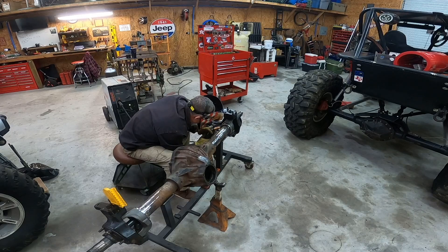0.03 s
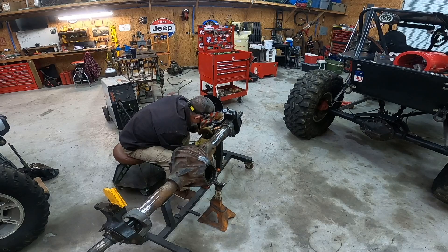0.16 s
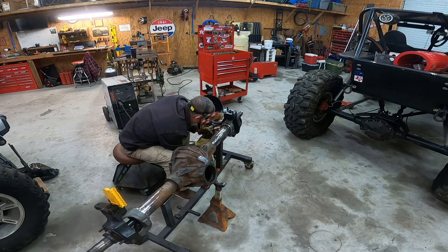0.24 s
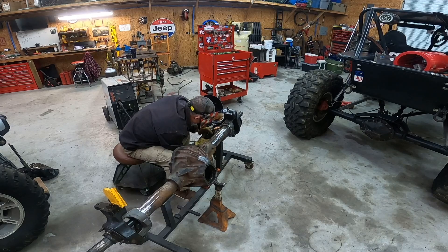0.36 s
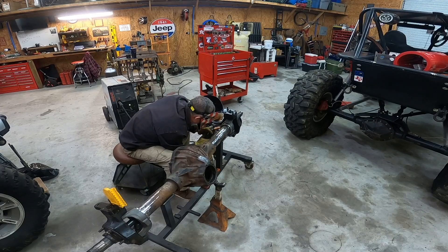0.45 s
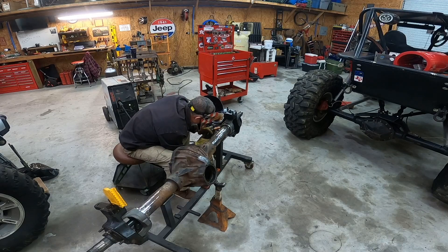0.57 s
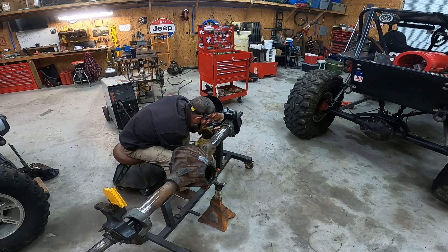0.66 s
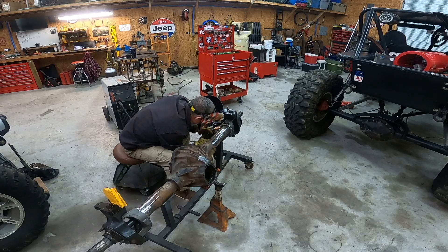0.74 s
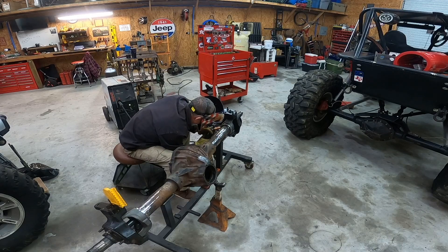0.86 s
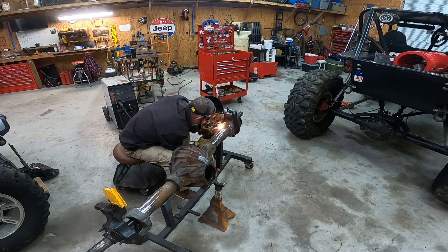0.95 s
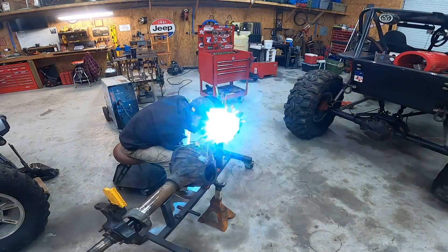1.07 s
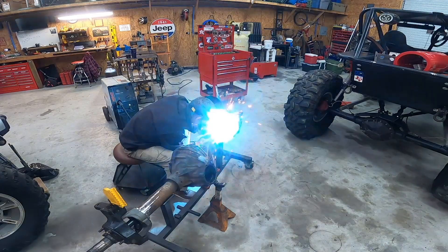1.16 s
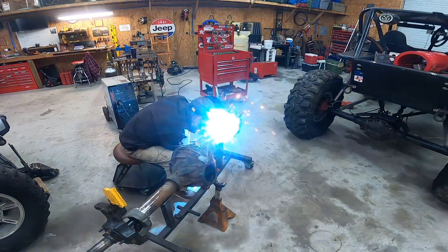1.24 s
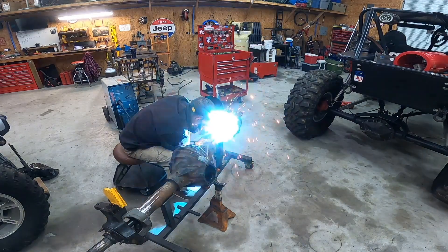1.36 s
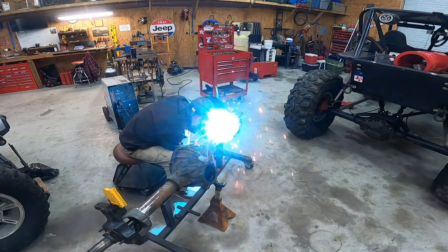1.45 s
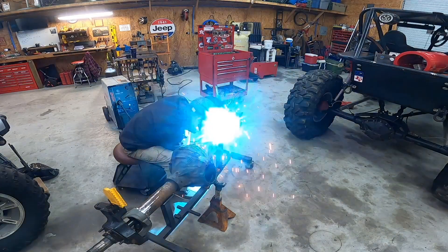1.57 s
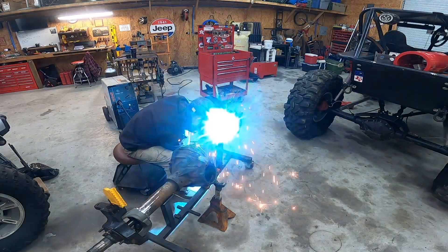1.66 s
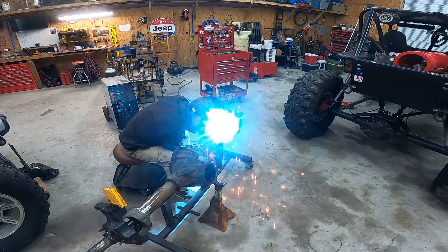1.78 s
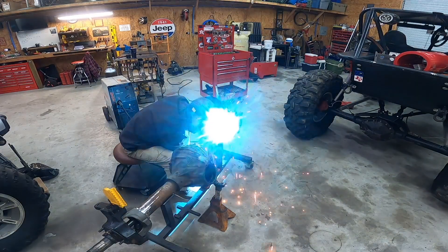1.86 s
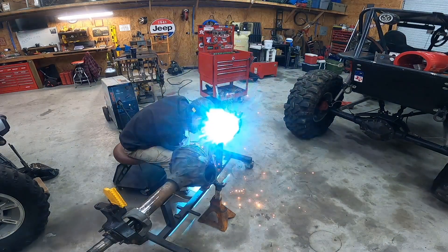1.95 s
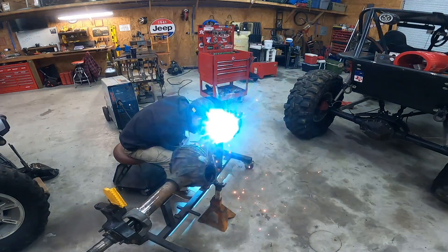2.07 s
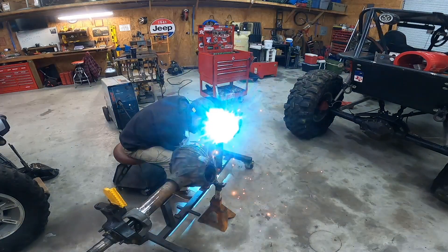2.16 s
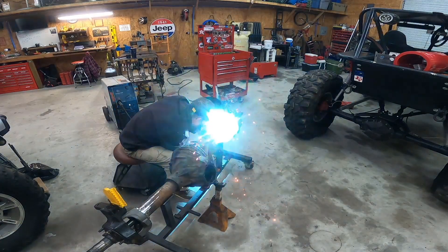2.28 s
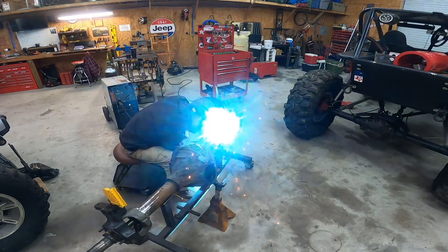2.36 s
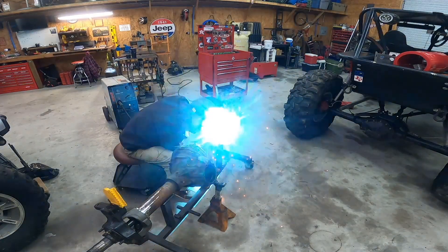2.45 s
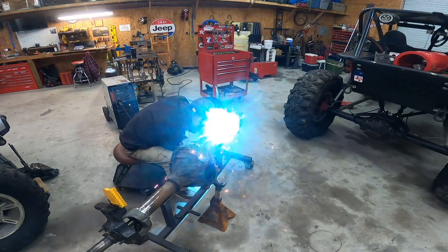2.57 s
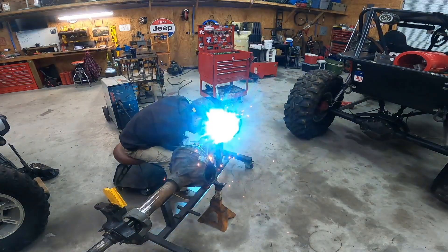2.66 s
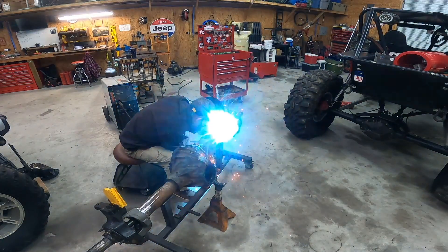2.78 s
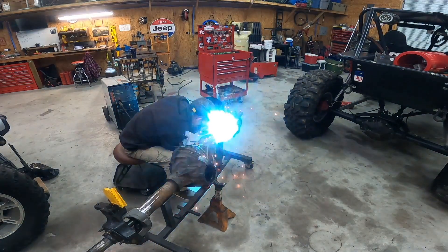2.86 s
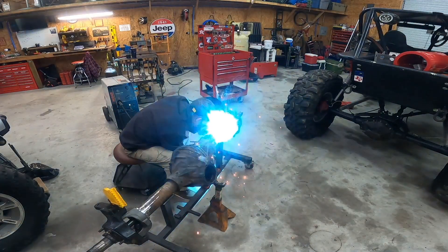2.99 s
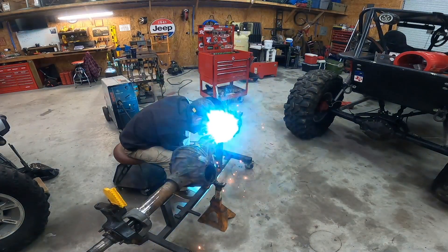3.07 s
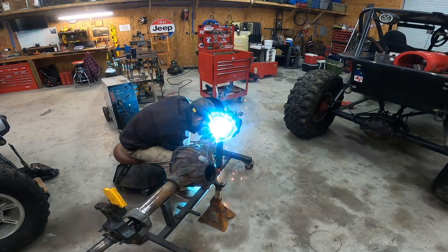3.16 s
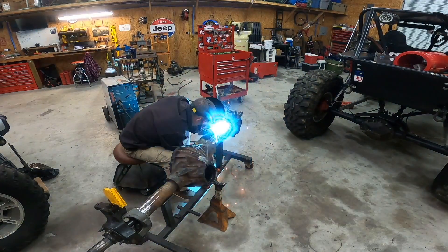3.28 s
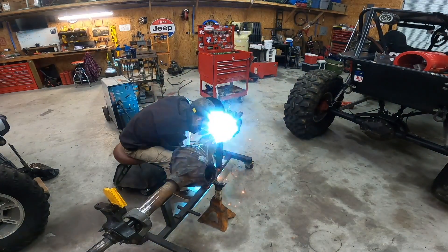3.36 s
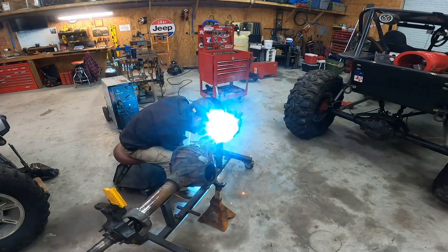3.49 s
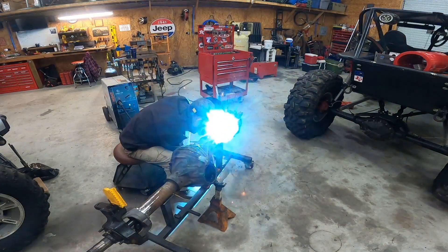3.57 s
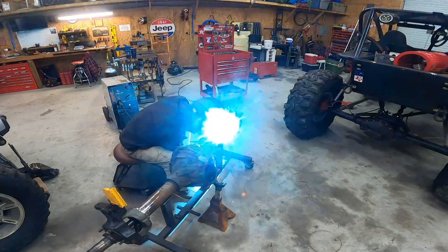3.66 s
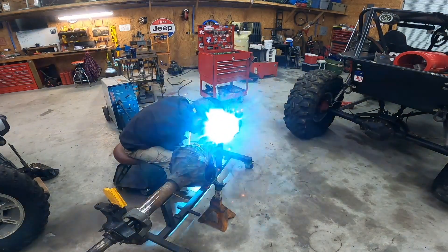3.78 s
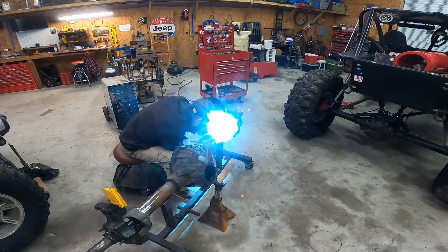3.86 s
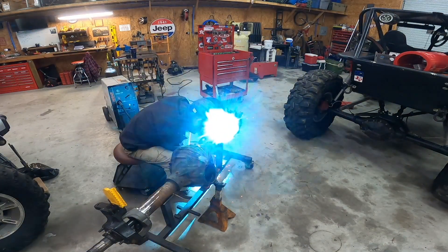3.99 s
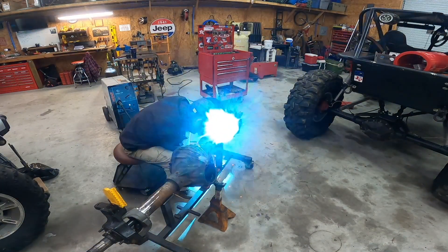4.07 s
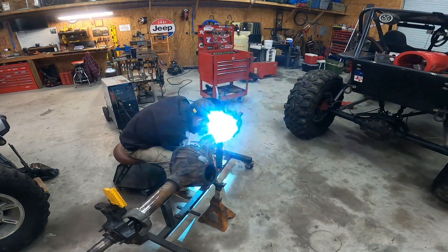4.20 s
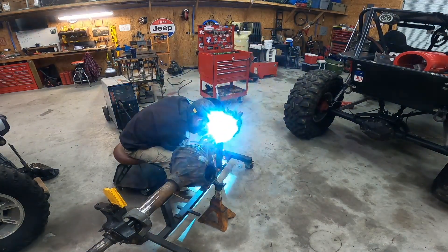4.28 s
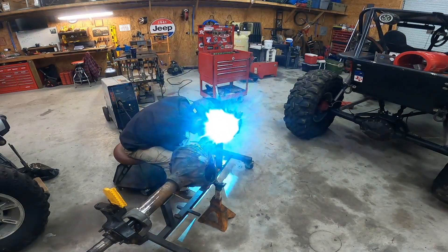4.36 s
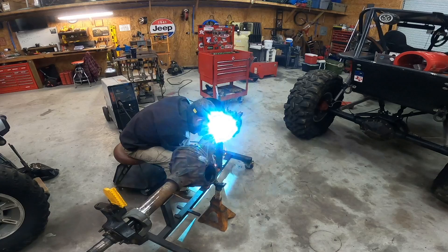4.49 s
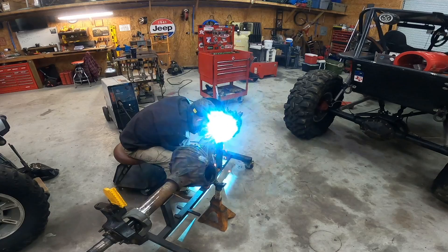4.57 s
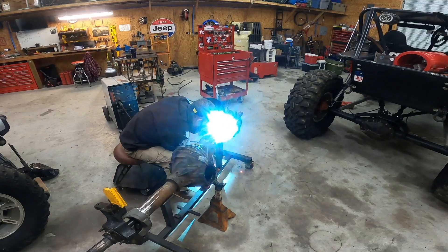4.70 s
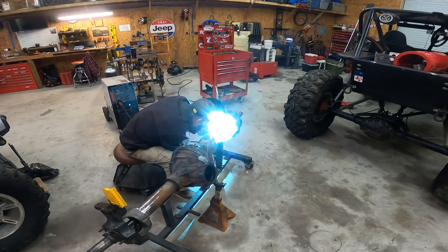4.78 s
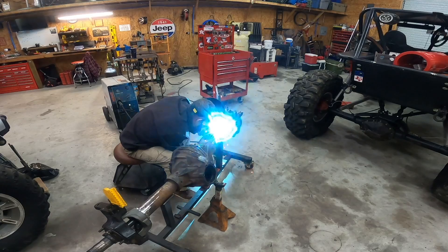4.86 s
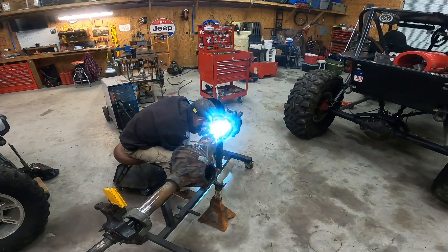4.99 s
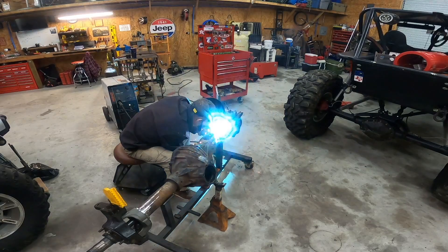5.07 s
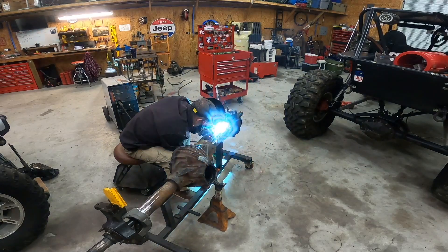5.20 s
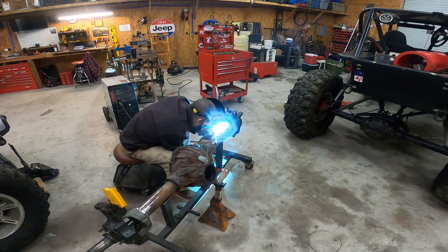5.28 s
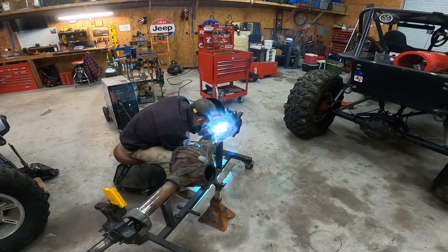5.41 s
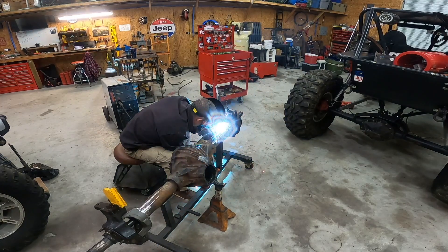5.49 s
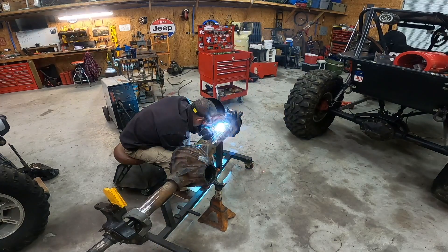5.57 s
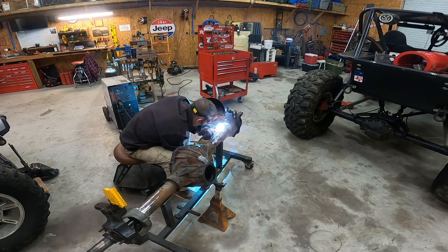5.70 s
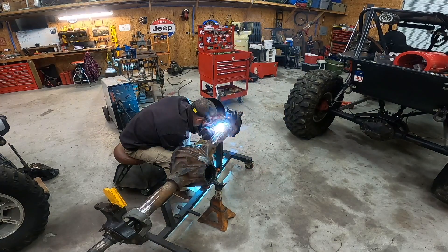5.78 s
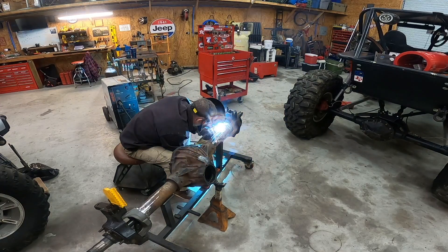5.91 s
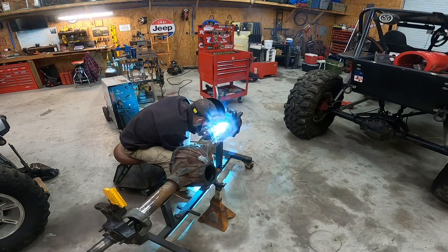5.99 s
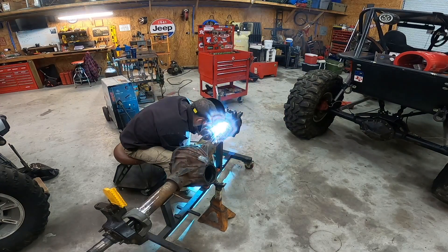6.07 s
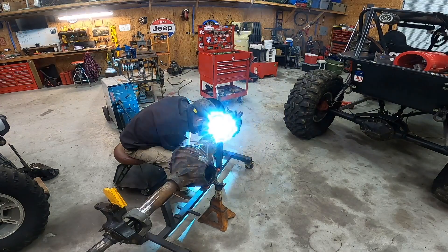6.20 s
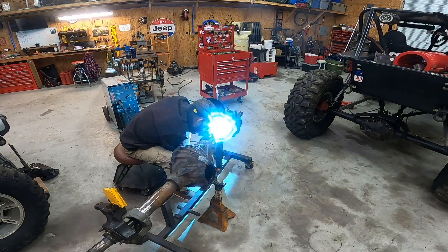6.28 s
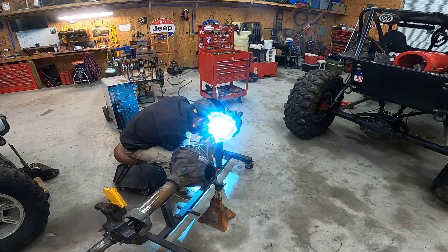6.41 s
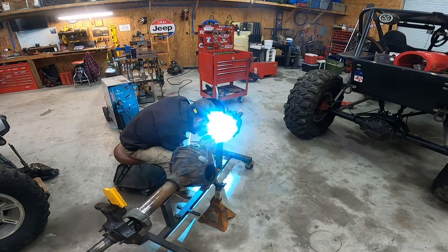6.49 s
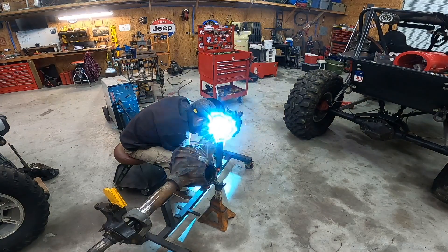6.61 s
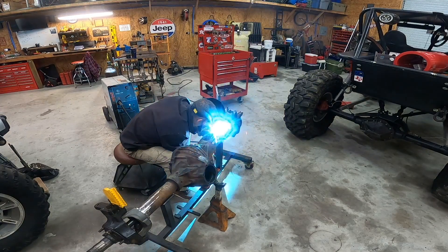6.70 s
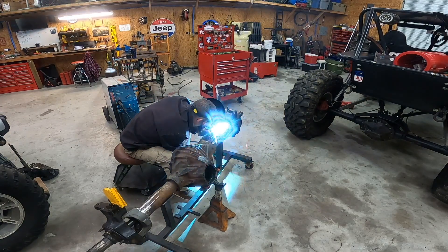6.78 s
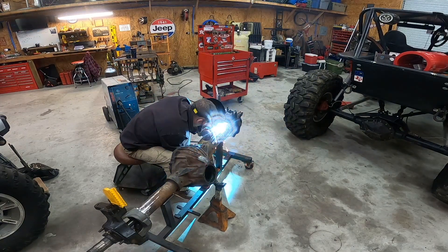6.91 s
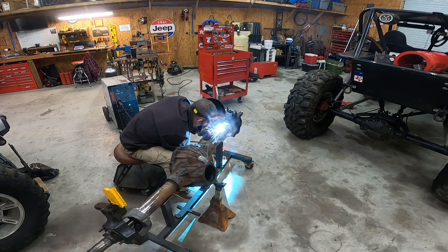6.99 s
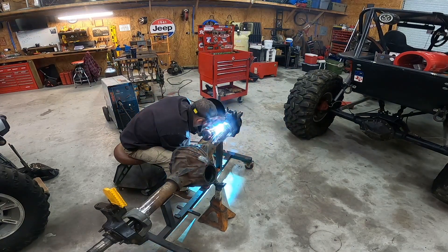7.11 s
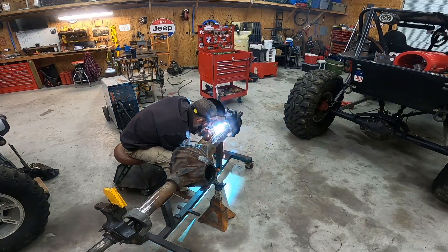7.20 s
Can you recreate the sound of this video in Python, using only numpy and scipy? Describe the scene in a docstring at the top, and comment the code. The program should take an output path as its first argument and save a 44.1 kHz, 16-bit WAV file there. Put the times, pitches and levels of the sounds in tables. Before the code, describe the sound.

Heard by a small fixed camera in a home garage: nearly a second of low air noise, then a crisp gas puff and muffled ignition whoomp. A harsh buzzing weld follows, dozens of snapping shorts a second, with taller cracks, dense sputters and faint steel ringing. From about five seconds it drops markedly, shaded by the tube, uneven and hollow with small spitting flurries and bright fizzing ticks. Live room echoes surround it; no clear stop.

```python
"""In a workshop a wire-feed welder lays one bead on a steel axle tube, heard by a small camera.
After fan air, hum and a faint squeak, gas hisses and the wire catches with a whoomp.
Then it shorts and re-ignites, at first very fast, later some 65 to 90 times a second, in sharp pulses.
Taller pops stand out, and the pool sputters in spells of dense noise pulses.
As the torch moves round behind the tube, filters and gains make the crackle softer and duller."""
import sys
import numpy as np
from scipy import signal
from scipy.fft import rfft, irfft, next_fast_len
from scipy.io import wavfile
from scipy.ndimage import uniform_filter1d, map_coordinates

SR = 44100
rng = np.random.default_rng(int(sys.argv[2]) if len(sys.argv) > 2 else 0)


def master(y):
    """Save y as 16-bit WAV."""
    cut = np.clip(np.atleast_2d(y).T, -1, 1)
    pcm = np.round(cut * 32767)  # scale
    wavfile.write(sys.argv[1], SR, pcm.astype(np.int16))


N = 319725

# how far the arc has moved behind the tube: t/s, place (0 in view, 1 at the edge, 2 hidden)
HIDDEN_PATH = [(1, 0), (3.3, 0), (4, 0.53), (4.35, 1.26), (4.9, 1.33), (5.35, 1.78), (7.2, 2)]
# loud pops of bursting wire: t/s, level/dB
BIG_POPS = [(1.0435, 0.5), (1.126, -3), (1.1521, 5.5), (1.205, 2), (1.222, 6.5), (1.287, 5.5),
            (1.3093, 5.5), (1.3362, 4.5), (1.3698, 2), (1.3927, 5), (1.4164, 0), (1.4344, 4.5), (1.5279, 5),
            (1.6718, 3.5), (1.7205, 4), (1.7862, 1), (1.792, -3), (1.9222, 3.5), (1.968, 1), (2.0774, 4.5),
            (2.0929, 4), (2.2111, 5), (2.2366, 2.5), (2.2784, 4.5), (2.2923, 4), (2.351, 2.5), (2.4714, 4),
            (2.487, 4.5), (2.5108, 5.5), (2.6, 5), (2.663, 5), (2.6945, 4.5), (2.7501, 4), (2.8438, 5),
            (2.9133, 5.5), (2.9697, 3.5), (3.635, -1), (3.7353, 2), (3.764, 4.5), (3.8575, 5.5),
            (4.0759, 5.5), (4.1, 2), (4.1182, 1), (4.202, 3), (4.252, 3), (4.296, 4), (4.349, 0),
            (4.5202, 3), (4.5466, 6), (4.559, 2.5), (4.595, 3), (4.62, 4.5), (4.6273, 3), (4.644, 1),
            (4.863, 1.5), (4.8938, 6.5), (4.9278, -2.5), (5.1514, -5), (5.1926, 2.5), (5.2113, -1),
            (5.304, -3), (5.342, -2.5), (5.4604, -5), (5.4851, -5), (5.5195, -1), (5.5314, -9), (5.596, -4),
            (5.7315, -9), (5.764, -1.5), (5.8216, 1), (5.837, -3), (5.883, -5), (5.9142, -5), (5.9823, -3),
            (5.9998, -1), (6.0154, -3), (6.026, -9), (6.1103, -5.5), (6.1644, -7), (6.2036, -5),
            (6.2363, -4), (6.329, -2), (6.6466, -5.5), (6.703, -2), (6.8538, -4), (7.04, -7), (7.08, -5)]


def amp(db):
    """Turn decibels into gain."""
    return 10 ** (np.asarray(db) / 20)


def along(points, hz):
    """Read a curve of (frequency, value) points, with frequency on a log axis."""
    f, v = np.transpose(points)
    return np.interp(np.log(hz + 1), np.log(f + 1), v)


def curves(rows):
    """Draw straight lines between rows: one value per sample for each column after the time."""
    s, *cols = np.transpose(rows)
    return [np.interp(np.arange(N) / SR, s, c) for c in cols]


def filtered(x, response):
    """Multiply the spectrum of x by a response of frequency."""
    m = next_fast_len(N + SR // 2)
    hz = np.fft.rfftfreq(m, 1 / SR)
    return irfft(rfft(x, m) * response(hz), m)[..., :N]


def coloured(x, spectrum, size=4096):
    """Give x a tone colour with a filter of energy 1 that never sounds ahead of its input."""
    gain = amp(along(spectrum, np.fft.rfftfreq(size, 1 / SR)))
    # folding the cepstrum (spectrum of the log gain) moves the filter's energy to its start
    cepstrum = irfft(np.log(gain))
    cepstrum[1:size // 2] *= 2
    cepstrum[size // 2 + 1:] = 0
    kernel = irfft(np.exp(rfft(cepstrum)))
    return signal.oaconvolve(x, kernel / np.linalg.norm(kernel))[:N]


def wobble(rate):
    """Draw a smooth random curve through rate random points a second."""
    knots = rng.standard_normal(int(N * rate / SR) + 4)
    return map_coordinates(knots, [np.arange(N) * rate / SR])


def steady(x, seconds):
    """Even out the running power of x towards 1."""
    width = int(seconds * SR)
    power = uniform_filter1d(uniform_filter1d(x ** 2, width), width)
    return x / np.sqrt(np.abs(power) + 1e-9)


def pulses(rate, scatter, spread_db, count=9000):
    """Place single-sample pulses at uneven gaps and of uneven size, about rate a second."""
    gap, size = rng.standard_normal((2, count))
    gaps = np.exp(scatter * gap)
    # each pulse falls where the running count of the rate reaches its turn
    at = np.searchsorted(np.cumsum(rate) / SR, np.cumsum(gaps / gaps.mean()))
    sizes = amp(spread_db * np.tanh(size))
    return np.bincount(at[at < N], sizes[at < N], N)


def swells(rows, attack, release):
    """Sum gains from (start s, length s, dB) rows: each rises, holds and dies away."""
    t = np.arange(N) / SR
    total = 0
    for s, length, db in rows:
        rise = np.clip((t - s) / attack, 0, 1)
        fall = np.exp(-np.maximum(t - s - length, 0) / release)
        total = total + amp(db) * rise * fall
    return total


def idle():
    """Fan air is filtered noise; the welding machine adds a faint, unsteady sine hum."""
    # tone of the quiet shop: f/Hz, level/dB
    air_tone = [(25, -4), (50, -38), (80, -13), (120, -1.5), (200, 0), (450, -3), (650, -10.5),
                (1200, -15.5), (2400, -22.5), (4000, -31.5), (6500, -48), (12000, -64)]
    mains_hz = 120
    hum = amp(-72.0 + 1.7 * wobble(7)) * np.sin(2 * np.pi * mains_hz * np.arange(N) / SR)
    air = amp(-59.5 + wobble(14)) * coloured(rng.standard_normal(N), air_tone)
    return hum + air


def squeak(waver_hz=30):
    """As the welder takes aim something squeaks faintly: short tones of wavering pitch."""
    # tones of the squeak: f/Hz, level/dB
    tones = [(3214, -89), (3671, -80)]
    start_s, length_s = 0.45, .09
    total = 0
    for hz, db in tones:
        phase = 2 * np.pi * np.cumsum(hz + waver_hz * wobble(61)) / SR
        swell = swells([(start_s, length_s, db)], attack=.02, release=.02)
        total = total + swell * np.sqrt(2) * np.sin(phase)
    return total


def burning(start=0.92, rise=0.021):
    """Rise from 0 before the trigger is pulled to 1 once gas and current flow (seconds)."""
    return np.clip((np.arange(N) / SR - start) / rise, 0, 1) ** 2


def touches(spikes, count=9000):
    """The wire clicks as it touches the pool, a few milliseconds before each short bursts."""
    short_s, short_scatter, spread_db = .0036, .35, 5
    lead, size = rng.standard_normal((2, count))
    at = np.flatnonzero(spikes)
    early = at - short_s * (1 + short_scatter * np.tanh(lead[:len(at)])) * SR
    sizes = spikes[at] * amp(spread_db * np.tanh(size[:len(at)]))
    return np.bincount(np.clip(early, 0, N - 1).astype(int), sizes, N)


def fizz(spikes, rise_s=0.00033, fall_s=0.0013):
    """Surround each spike with a brief spray of noise."""
    t = np.arange(-(SR // 100), SR // 100 + 1) / SR
    shape = np.exp(-np.abs(t) / np.where(t < 0, rise_s, fall_s))
    power = signal.oaconvolve(spikes ** 2, shape / shape.sum(), "same")
    return np.sqrt(np.abs(power)) * rng.standard_normal(N)


def crackle(trim_db=-2.5, flutter_db=1.05, fizz_share=0.62):
    """Each short makes a touch and a burst spike, over a sizzle of tiny ticks; returns (shorts, sizzle)."""
    # strength of the crackle ahead of the trim: t/s, level/dB
    strength = [(.94, -27.5), (1.02, -39), (1.1, -27), (1.14, -21.5), (1.25, -25), (1.4, -24.5),
                (1.55, -23.5), (2.2, -20.5), (2.9, -23), (3.45, -21.5), (3.75, -22.5), (4.25, -23.5),
                (4.55, -24.5), (4.75, -24), (5.05, -26), (5.3, -31.5), (5.55, -31), (5.8, -30.5),
                (6.3, -33.5), (6.55, -36), (7.25, -34)]
    # wire feed: t/s, shorts per second/Hz, sizzle against shorts/dB, touch against burst/dB
    feed = [(.93, 260, 5, -9), (1.1, 160, 1, -7), (1.25, 69, -9, -3), (1.7, 87.3, -7, -5.5),
            (3.6, 82.7, -7, -2), (4.4, 89.5, -29, -10), (5.0, 91, -16, -6), (5.5, 73.4, -1, -6),
            (7.2, 65.7, -3.5, -11)]
    # flurries in which the wire stubs and spits harder: start/s, length/s, level over the crackle/dB
    flurries = [(1.305, 0.03, -2), (5.145, 0.017, 4), (5.615, 0.013, -2), (5.67, 0.02, -5),
                (5.755, .015, -1), (5.81, 0.026, 3.5), (5.985, 0.047, 1.5), (6.21, 0.023, 3),
                (6.262, 0.017, 2.5), (6.38, 0.026, -1.5), (6.67, 0.031, 5.5), (6.85, 0.012, 3),
                (7.02, 0.031, 5), (7.225, 0.023, 2.5)]
    # moments in which the arc nearly goes out: start/s, length/s
    stalls = [(1.157, 0.032), (2.697, 0.028), (2.979, 0.022), (3.73, 0.029), (4.658, 0.022), (5.211, .025),
              (5.563, 0.024), (6.722, 0.025)]
    stall_db = -28
    # the arc is shorted out before a big pop and takes a moment to resume
    hush_db, hush_s, recover_s = -8, .012, 0.0027

    level_db, = curves(strength)
    rate, sizzle_db, touch_db = curves(feed)
    spitting = np.hypot(1, swells(flurries, attack=0.0078, release=0.011))
    flutter = amp(flutter_db * wobble(40))  # the arc length never holds still
    level = burning() * amp(level_db + trim_db) * flutter * spitting
    level = level / np.hypot(1, amp(sizzle_db))  # share the power between shorts and sizzle
    for s, _ in BIG_POPS:
        level[round((s - hush_s) * SR):round((s + recover_s) * SR)] *= amp(hush_db)
    for s, length in stalls:
        level[round(s * SR):round((s + length) * SR)] *= amp(stall_db)

    bursts = pulses(rate, scatter=.3, spread_db=3.5)
    pairs = bursts + amp(touch_db) * touches(bursts)
    # the wire feeds evenly: slower shorts grow bigger drops
    spikes = level * steady(pairs, seconds=0.051)
    ticks = pulses(np.full(N, 900.), scatter=.9, spread_db=6.0) * rng.choice([-1, 1], N)
    sizzle = level * amp(sizzle_db) * steady(ticks, seconds=0.056)
    return spikes + fizz_share * fizz(spikes), sizzle


def gas(start=.929, length=.04, db=-32):
    """The valve opens and pressure stored in the hose escapes in a crisp hiss of filtered noise."""
    # hiss of the nozzle: f/Hz, level/dB
    hiss_tone = [(800, -35), (2800, 0), (4200, 1), (6000, -9), (9300, -6), (10700, -25), (14000, -43)]
    swell = swells([(start, length, db)], attack=0.0072, release=0.1)
    return swell * coloured(rng.standard_normal(N), hiss_tone)


def flare(lumps_db=3):
    """Each pocket of gas burns off in a short, lumpy low whoomp of filtered noise."""
    # pockets catching, the first as the arc strikes: start/s, length/s, level ahead of the swell shape/dB
    pockets = [(0.933, 0.11, -19), (.99, 0.097, -29.5), (2.317, 0.038, -23), (2.641, 0.019, -24.5),
               (3.598, 0.02714, -28.5), (4.733, 0.044, -27)]
    # whoomp of burning gas: f/Hz, level/dB
    whoomp_tone = [(25, -5), (80, -14.5), (170, -1), (280, 1.5), (450, 5), (650, 3), (1050, -3),
                   (1400, -15), (3000, -3.5), (8000, -77)]
    level = 0
    for start, length, db in pockets:
        u = np.clip((np.arange(N) / SR - start) / length, 0, 1)
        level = level + amp(db) * np.sqrt(u) * (1 - u)
    noise = amp(lumps_db * wobble(130)) * rng.standard_normal(N)
    return level * steady(coloured(noise, whoomp_tone), seconds=0.015)


def pops(fizz_share=0.4):
    """A long short ends with the wire bursting in one tall spike with a little fizz."""
    s, db = np.transpose(BIG_POPS)
    spikes = np.bincount(np.round(s * SR).astype(int), amp(db), N)
    return spikes + fizz_share * fizz(spikes)


def round_the_tube(x, sway=0.072):
    """The tube shades the treble; close echoes shift with the welder's hand and count more as the arc hides."""
    # colour of the arc in plain view: f/Hz, level/dB
    open_tone = [(30, -119), (90, -33), (220, -35.5), (550, -9.5), (1250, -3.5), (2400, -6), (2950, 6),
                 (3800, 2), (4800, -0.5), (5700, -6.5), (7100, 3), (8600, -13), (9400, -3.5),
                 (11300, -10.5), (15000, -36.5)]
    # colour at the tube's edge: f/Hz, level/dB
    edge_tone = [(30, -60), (220, -20), (550, -29), (1200, -8.5), (1700, -26), (2450, -13), (2900, 2.5),
                 (3700, 5.5), (4400, -6), (5100, -2), (5900, -11.5), (7300, -5.5), (10500, -20.5),
                 (11800, -21), (15000, -68)]
    # colour behind the tube: f/Hz, level/dB
    shaded_tone = [(30, -66), (220, -13.5), (500, -11), (900, -24), (1300, -7.5), (1600, -18),
                   (2400, -16.5), (3100, -1.5), (3800, -3), (4600, -15.5), (5900, -19.5), (6400, -16),
                   (7400, -14), (8800, -20.5), (9350, -16), (10000, -22), (10700, -20.5), (11300, -22),
                   (15000, -50)]
    # reflections off helmet, tube and housing: middle delay/s, gain ahead of the weight below
    reflections = [(.00076, 0.15), (.0014, 0.025), (.0024, 0.12)]
    hidden = np.clip(curves(HIDDEN_PATH)[0], 0, 2)
    heard = 0
    for k, tone in enumerate((open_tone, edge_tone, shaded_tone)):
        share = np.clip(1 - np.abs(hidden - k), 0, 1)
        heard = heard + coloured(x * share, tone)
    now = np.arange(N)
    late = 0
    for delay, gain in reflections:
        moving_delay = delay * SR * (1 + sway * wobble(4))
        late = late + gain * map_coordinates(heard, [now - moving_delay])
    weight = 0.95 + 2.0 * np.minimum(hidden, 1)
    return amp(0.48) * (heard + weight * late)


def steel(x):
    """The arc's pulses keep the steel parts ringing faintly in decaying sine tones."""
    # ringing modes of the steel, balanced against each other: f/Hz, level/dB
    modes = [(532.9, 17), (1265, 5.5), (2083, 23.5), (2347, 25.5), (2929, 13), (3575, 18), (4409, 21.5),
             (4608, 23), (4737, 13), (5033, -2)]
    t = np.arange(SR // 2) / SR
    t60 = .15  # seconds to fall by 60 dB
    ring = sum(amp(db - 60 * t / t60) * np.sin(2 * np.pi * hz * t) for hz, db in modes)
    return amp(-12.5) * signal.oaconvolve(x, ring / np.linalg.norm(ring))[:N]


def echoes(build=0.0036, count=10):
    """Make one room response: scattered echoes off floor and cabinets, with a diffuse tail."""
    # time for the room to fall by 60 dB: f/Hz, t/s
    room_t60 = [(150, 0.63), (1000, 1), (4000, 0.83), (12000, 0.66)]
    t = np.arange(SR // 2) / SR
    arrivals = rng.standard_normal(len(t)) * (1 - np.exp(-t / build))
    arrivals[(rng.uniform(.01, .035, count) * SR).astype(int)] += 7 * rng.choice([-1, 1], count)
    # every frequency band dies away at its own speed
    hz, s, z = signal.stft(arrivals, SR, nperseg=256)
    decay = amp(-60 * s / along(room_t60, hz)[:, None])
    decay = decay / np.linalg.norm(decay, axis=1, keepdims=True)
    tail = signal.istft(z * decay, SR, nperseg=256)[1]
    return tail / np.linalg.norm(tail)


def shop(x, count=7):
    """The room answers; its pattern of echoes changes as the torch travels."""
    # room against direct sound: f/Hz, level/dB
    room_tone = [(150, -1), (1000, -2), (2300, 4), (3000, -5.5), (3700, -5), (5000, 1), (7000, -4),
                 (12000, -7.5)]
    place = np.linspace(0, count - 1, N)
    wet = 0
    for k in range(count):
        share = np.sqrt(np.clip(1 - np.abs(place - k), 0, 1))
        wet = wet + signal.oaconvolve(x * share, echoes())[:N]
    return filtered(wet, lambda hz: amp(along(room_tone, hz)))


def sputter(flutter_db=3.5):
    """The long arc flutters over the pool in dense soft puffs, far stronger during a spell."""
    # bubbling between spells, building up as the steel melts: t/s, level/dB
    bubbling = [(1.0, -65), (1.45, -48.5), (1.65, -37), (3.0, -40), (4.3, -43), (5.1, -43.5), (5.4, -39.5),
                (6.1, -41), (6.35, -40.5), (6.65, -44.5), (7.25, -43)]
    # spells in which the arc grows long: start/s, length/s, level/dB
    spells = [(1.69, 0.031, -44), (1.83, 0.042, -32), (2.32, 0.099, -31), (2.565, 0.09, -30.5),
              (2.97, 0.048, -38), (3.46, 0.17, -33.5), (3.67, 0.055, -30), (3.94, 0.072, -32),
              (4.56, 0.047, -35), (4.73, 0.101, -29), (4.86, 0.048, -31.5), (5.04, 0.044, -33),
              (7.015, 0.044, -39)]
    # tone of the puffs: f/Hz, level/dB
    puff_tone = [(25, -35), (80, -36), (130, -32.5), (200, -4.5), (450, 5.5), (750, 9.5), (1250, 3),
                 (2200, 1.5), (3500, 2), (8000, -40)]
    pool_db, = curves(bubbling)
    level = np.hypot(amp(pool_db), swells(spells, attack=0.0013, release=0.011))
    puffs = pulses(np.full(N, 380.), scatter=.7, spread_db=3.0) * rng.choice([-1, 1], N)
    puffs = steady(puffs, seconds=0.046)
    return coloured(burning() * level * amp(flutter_db * wobble(36)) * puffs, puff_tone)


def behind():
    """Rise from 0 while the arc can be seen to 1 once the tube hides it."""
    return np.clip(curves(HIDDEN_PATH)[0] - 1, 0, 1)


def hollow(x, wander=0.068):
    """Behind the tube the arc rings the gap round the torch, at a pitch that keeps shifting."""
    # middle pitch of the gap, which changes as the hand weaves: t/s, f/Hz
    gap_pitch = [(5.2, 3580), (5.62, 3500), (5.69, 3050), (5.76, 4130), (5.83, 3580), (5.92, 3460),
                 (5.99, 3850), (6.05, 3560), (6.12, 3130), (6.2, 3610), (6.7, 3840), (7.1, 3960)]
    t60, level_db = 0.014, -1  # seconds to fall by 60 dB, dB
    hz = curves(gap_pitch)[0] * (1 + wander * wobble(70))
    turn = np.exp(2j * np.pi * np.cumsum(hz) / SR)
    decay = amp(-60 * np.arange(SR // 50) / SR / t60)
    # shift the moving pitch down to 0 Hz, let it ring there, then shift it back
    ring = signal.oaconvolve(x * behind() / turn, decay / np.linalg.norm(decay))[:N] * turn
    return amp(level_db) * np.sqrt(2) * ring.real


def spatter():
    """Flying drops of steel fizzle in quick runs of bright ticks."""
    # drops that fizzle: start/s, length/s, level/dB
    drops = [(4.155, 0.01, -29), (4.22, 0.13, -37), (5.924, 0.017, -32), (6.31, .016, -41),
             (6.7, 0.0047, -38), (7.005, 0.026, -38.5), (7.079, 0.006, -33)]
    # tone of the fizzle: f/Hz, level/dB
    drop_tone = [(1000, -50), (5500, -19), (7500, -8), (8800, -21), (9350, 4.5), (10000, -15),
                 (10700, -0.5), (11300, -19), (15000, -37)]
    ticks = pulses(np.full(N, 500.), scatter=1.0, spread_db=7) * rng.choice([-1, 1], N)
    ticks = steady(ticks, seconds=0.041)
    return coloured(swells(drops, attack=0.0014, release=0.0044) * ticks, drop_tone)


def scene():
    """Mix the shop nearly in mono; an echo of the mix sets left and right apart, most at the very top."""
    # side against mid: f/Hz, level/dB
    width = [(100, -16.5), (1000, -52.5), (4000, -51), (10000, -20.5), (11500, -10), (15000, 8)]
    # loss once the arc is hidden: on the whole direct path, and on the big pops on top of that
    shade_db, pop_shade_db = -1, -4.5
    shorts, sizzle = crackle()
    bangs = pops()
    arc = shorts + sizzle + bangs * amp(pop_shade_db * behind())
    direct = round_the_tube(arc * amp(shade_db * behind()))
    gap_ring = hollow(shorts + bangs + amp(-11.5) * sizzle)
    weld = direct + gap_ring + sputter() + spatter() + flare() + gas()
    mid = weld + steel(arc) + shop(weld) + idle() + squeak()
    side_echo = signal.oaconvolve(mid, echoes())[:N]
    side = filtered(side_echo, lambda hz: amp(along(width, hz)))
    return np.array([mid + side, mid - side])


def record(dry, skew_rad=2.5):
    """The camera skews the spikes, rounds off the tallest, thins the bass and cuts all above its band limit."""
    top_hz = 15750
    skewed = filtered(dry, lambda hz: np.exp(1j * skew_rad))  # the same phase turn at all frequencies
    rounded = skewed / (1 + (skewed / .9) ** 8) ** (1 / 8)  # stays within 0.9 of full scale
    low_cut = signal.butter(2, 100, "highpass", fs=SR, output="sos")
    return filtered(signal.sosfilt(low_cut, rounded), lambda hz: hz < top_hz)


dry = scene()
out = record(dry)
master(out)
```